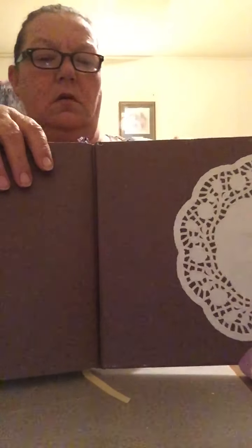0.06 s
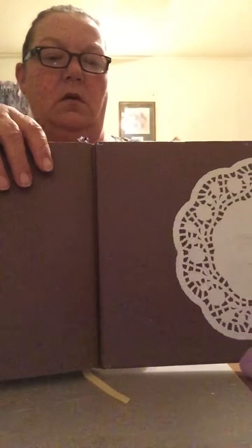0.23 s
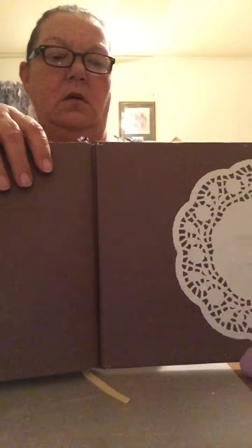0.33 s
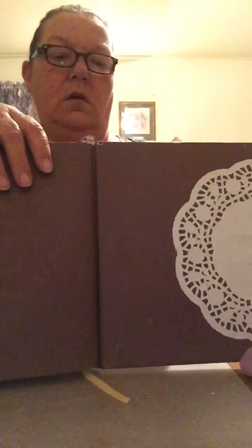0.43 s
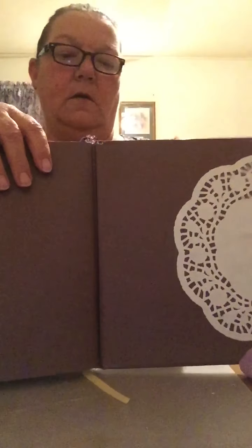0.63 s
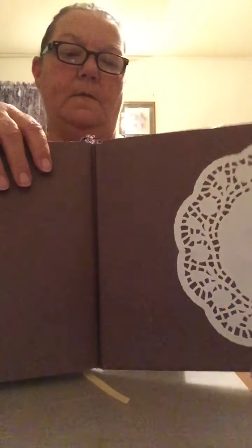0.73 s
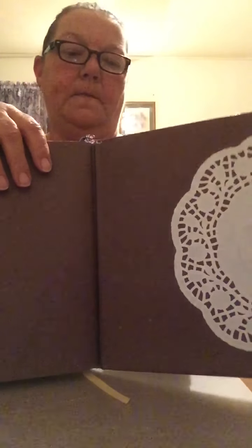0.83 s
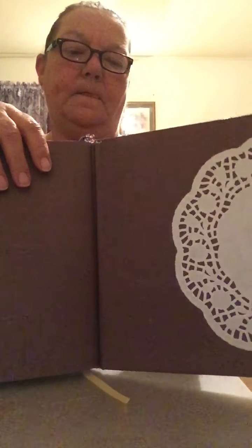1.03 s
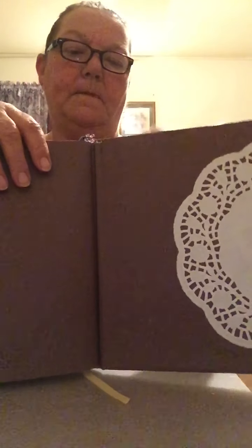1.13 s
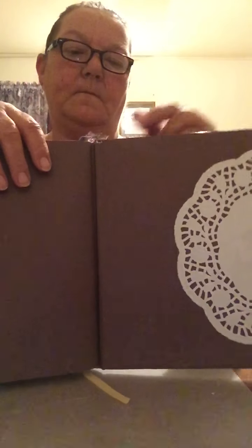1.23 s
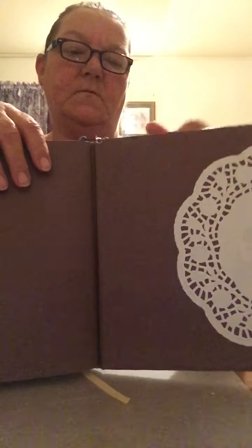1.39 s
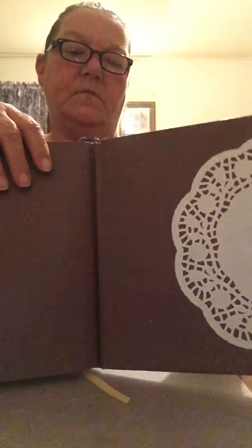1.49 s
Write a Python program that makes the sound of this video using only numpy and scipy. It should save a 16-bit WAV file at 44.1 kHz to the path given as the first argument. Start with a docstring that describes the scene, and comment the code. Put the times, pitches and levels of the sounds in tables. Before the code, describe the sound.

A cardboard book cover gives one hard snap as it is handled close to the microphone in a small room. Beads on its spine then tick and knock lightly, with soft card rustles and finger bumps over a low hum.

```python
"""Faint ticks and a brush of card come first, then one hard snap rings through a small room.
A cardboard book with beads on its spine is handled close by. The blow excites the cover's damped
modes; beads tick and knock, and fingers bump the boards. Friction makes card hiss and squeak as it
slides, and draws a soft groan from the swinging cover. A low hum runs underneath."""
import sys
import numpy as np
from scipy import signal
from scipy.fft import rfft, irfft, next_fast_len
from scipy.io import wavfile
from scipy.ndimage import map_coordinates

SR = 44100
rng = np.random.default_rng(int(sys.argv[2]) if len(sys.argv) > 2 else 0)


def pcm_store(signal):
    """Save signal as 16-bit PCM."""
    levels = np.round(np.clip(np.atleast_2d(signal), -1, 1) * 32767)
    wavfile.write(sys.argv[1], SR, levels.astype(np.int16).T)


N = 68355
T = np.arange(N) / SR

# modes of the cover under the snap: f/Hz, level/dB, t60/s
COVER_MODES = [(345, -17.5, 0.041), (637, -9.5, 0.02), (985, -1.5, 0.019), (1270, 2, 0.011),
               (1442, -17, 0.027), (2005, -9.5, 0.019), (2283, -8, 0.023), (2617, -3.5, 0.013),
               (3150, 4.5, 0.0089), (3894, -2.5, 0.0094), (4510, -17.5, 0.018), (5500, -13, 0.0077),
               (6220, -11, 0.0064), (8270, -22, 0.0055)]
# spectrum of the snap's crack: f/Hz, level/dB
CRACK_SPECTRUM = [(200, -28), (1000, 6.5), (4000, -5.5), (7000, -2), (11000, -16.5), (16000, -40)]
# echoes of the snap from near walls: delay/s, level/dB
WALL_ECHOES = [(.0098, -18.5), (.017, -21), (0.0237, -18)]
# modes of the boards and nearby things that ring on: f/Hz, level/dB, t60/s
SYMPATHETIC_MODES = [(335, -25.5, 0.22), (417.4, -29, 0.22), (576, -31.5, 0.081), (648.7, -33, 0.31),
                     (909, -28, 0.12), (966, -28, 0.14), (1094, -56, 1.6), (1245, -45, 0.98),
                     (1290, -31.5, .18), (1485, -32.5, 0.27), (1670, -51.5, 0.8), (2248, -38, 0.32),
                     (2333, -51.5, .6), (2652, -36.5, 0.27)]
# firm bead knocks: t/s, level/dB, most strongly excited f/Hz
BEAD_KNOCKS = [(.5035, -34, 2301), (.506, -30.5, 670), (.5402, -33, 670), (1.3558, -29.5, 1605),
               (1.4346, -22, 3320), (1.438, -23, 852), (1.482, -35, 4000)]
# modes of the board under a bead: f/Hz, level/dB, t60/s
KNOCK_MODES = [(699.4, -13, 0.085), (919, -4.5, 0.021), (1575, -3, 0.015), (3257, -2.5, 0.0096),
               (3460, -0.5, 0.015), (4110, -6, .014)]
# light bead ticks: t/s, level/dB, t60/s, tilt/(dB per octave)
BEAD_TICKS = [(.009, -44, 0.043, 2.5), (0.017, -48.5, 0.032, -2.5), (.1477, -53, 0.028, -1.5),
              (0.2717, -22.5, 0.0061, -2.5), (.4995, -38, 0.036, 0.5), (.5026, -38, 0.041, 9.5),
              (.5052, -35.5, 0.036, -4), (0.5189, -34.5, 0.038, -7.5), (0.526, -42.5, 0.033, 3),
              (.5398, -39.5, 0.052, 1), (0.5459, -43, 0.022, 0), (0.5875, -54.5, 0.12, -0.5),
              (.8745, -43, .005, 6.5), (0.9652, -44.5, 0.013, 14.5), (.905, -58.5, 0.02, 0),
              (1.002, -55, 0.016, 2.5), (1.1, -55, 0.022, -7), (1.206, -61, 0.018, 4),
              (1.3435, -48, 0.031, -7), (1.351, -47.5, 0.02, 3), (1.3555, -39, 0.0164, 3.5),
              (1.379, -53, 0.0063, 0), (1.405, -44, 0.013, 5.5), (1.421, -48, 0.14, -6),
              (1.4338, -31, .024, 1.5), (1.445, -45.5, 0.039, -1.5), (1.4543, -37, 0.01, 1),
              (1.465, -39, 0.031, -4.5), (1.4819, -36.5, 0.0077, 6.5), (1.49, -43, 0.01, 3)]
# spectrum of a bead on card: f/Hz, level/dB
TICK_SPECTRUM = [(100, -9), (540, -9.5), (670, 9.5), (780, -10), (910, 0), (1150, 0), (1600, 0.5),
                 (1950, -8.5), (2300, -2), (2750, -1.5), (3100, -7.5), (3500, -6.5), (4200, -6),
                 (4800, -10), (6200, -8), (7300, -12.5), (8200, -13), (10000, -17.5), (16000, -23)]
# soft finger bumps: t/s, level/dB, f/Hz, t60/s
FINGER_BUMPS = [(0.169, -29.5, 89.67, 0.054), (0.204, -49.5, 244, 0.12), (0.452, -25, 206, 0.012),
                (.652, -25.5, 375.4, 0.021), (1.3994, -28, 139.6, 0.092), (1.402, -24.5, 324.5, 0.036),
                (1.543, -45, 226.5, 0.053)]
# dull taps on the board: t/s, level/dB, f/Hz
FINGER_TAPS = [(0.6515, -31.5, 965), (1.3995, -34.5, 673)]
# modes of a tap: ratio to its f, level/dB, t60/s
TAP_PARTIALS = [(0.962, 0.5, 0.026), (0.688, -10, 0.031), (1.7, -23, 0.036), (3.23, -6.5, 0.0046)]
# card sliding on card: start/s, end/s, rise/s, sag/(dB per s), level/dB, tilt/(dB per octave)
SLIDE_STROKES = [(-.02, 0.057, 0.02, 233.5, -48.5, 15), (.338, 0.394, 0.014, 229, -55.5, 14),
                 (0.323, 0.56, 0.024, 72, -45, -2), (0.493, 0.575, 0.012, 72, -54.5, 5.5),
                 (0.887, 1.096, 0.0394, 3.5, -69, -7.5), (1.035, 1.12, 0.017, 87.5, -66, 9),
                 (1.336, 1.368, 0.017, 208, -46, 0), (1.399, 1.496, 0.035, 219, -52.5, 6.5)]
# spectrum of sliding card: f/Hz, level/dB
SLIDE_SPECTRUM = [(200, -14), (1000, -7.5), (2700, -5.5), (3350, 3), (3900, -0.5), (4450, -0.5),
                  (4950, -12.5), (5600, -4.5), (6400, -11), (10000, -20.5), (16000, -29)]
# stick-slip squeaks: peak t/s, width/s, level/dB, f/Hz
SQUEAK_EVENTS = [(0.148, 0.0061, -53, 2585), (0.389, .022, -47, 3450), (0.592, 0.0067, -53.5, 5150),
                 (1.066, 0.014, -57, 3550), (1.067, 0.017, -62, 5400), (1.101, 0.0056, -57, 3575),
                 (1.099, 0.0035, -61, 6950), (1.293, 0.0091, -52, 3837)]
# tones of a squeak: ratio to its f, level/dB
SQUEAK_PARTIALS = [(0.492, -7), (.84, -10), (0.997, 2.5), (1.56, -16)]
# rubs of the swinging cover: start/s, end/s, level/dB, resonance f/Hz
COVER_RUBS = [(0.193, 0.308, -46.5, 169), (0.397, 0.495, -50.5, 139.7), (0.85, 1.197, -61, 321.5),
              (1.189, 1.38, -68.5, 315), (1.112, 1.367, -67, 137), (1.42, 1.49, -51, 148.5)]
# spectrum of the scrape in a rub: f/Hz, level/dB
SCRAPE_SPECTRUM = [(150, -3), (400, -3), (780, -7), (1150, 6), (1600, -5), (2250, -1.5), (5000, -17),
                   (16000, -28)]
# reverberation time of the room: f/Hz, t60/s
REVERB_TIMES = [(150, 0.83), (400, 0.17), (1200, 0.4), (3500, 0.41), (8000, 0.51), (16000, 0.36)]
# colour of the reflections: f/Hz, level/dB
WALL_RESPONSE = [(100, -2), (350, 5), (700, 2), (1000, -3.5), (2000, 1.5), (3100, -10), (4200, -2.5),
                 (5200, -9.5), (16000, -4)]
# harmonics of the hum: f/Hz, level/dB
HUM_PARTIALS = [(46.5, -17.5), (93.3, 2.5), (140, -15)]
# wavering envelope of the hum: t/s, relative level/dB
HUM_ENVELOPE = [(0.0, -48), (0.128, -60.5), (0.18, -43), (0.21, -55), (0.34, -55), (0.448, -49),
                (1.32, -53.5), (1.346, -64), (1.394, -54.5), (1.55, -72)]
# spectrum of the low rumble: f/Hz, level/dB
RUMBLE_SPECTRUM = [(20, -57.5), (32, -37), (42, -1.5), (75, -4.5), (120, -8), (200, -32), (500, -61)]
# envelope of the rumble: t/s, relative level/dB
RUMBLE_ENVELOPE = [(0.0, -56.5), (0.15, -53), (0.164, -50), (1.07, -61), (1.436, -60.5), (1.48, -47.5),
                   (1.55, -70)]
# spectrum of the room hiss: f/Hz, level/dB
HISS_SPECTRUM = [(25, -42.5), (60, -8.5), (130, 0.5), (200, 0), (400, -9.5), (700, -10.5), (2000, -12),
                 (4000, -15.5), (8000, -20), (16000, -23.5)]

SNAP_S, SNAP_RISE_S = 0.2473, 0.001
BEND_DELAY_S = 0.0005  # travel time of a 1 kHz bending wave
CRACK_DB, CRACK_T60 = -18.5, 0.012
KNOCK_FALL_DB = 9  # per octave away from the most strongly excited frequency
SLIDE_RELEASE_S, SQUEAK_JITTER_RAD = 0.033, 1.2
RIPPLE_DB, RIPPLE_SPACING_HZ = 4, 104.2
RUB_Q, RUB_SCRAPE_DB, RUB_EDGE_S = 4.2, -14, 0.1
TAIL_DB, EARLY_DB, EARLY_T60 = -19.5, -5.5, 0.2
SMALL_WET_DB, FINGER_WET_DB = -1.5, -8  # small, close sounds are drier; fingers are the driest
HUM_DB, RUMBLE_DB, HISS_DB = -0.5, 1, -68
LOW_HZ, TOP_HZ = 37, 16200


def snap():
    """Impact excitation: a crack and the cover's modes, echoed by walls. Dispersion puts treble first."""
    board = sum(amp(db) * ring(SNAP_S + BEND_DELAY_S * np.sqrt(1000 / hz), hz, t60, SNAP_RISE_S)
                for hz, db, t60 in COVER_MODES)
    crack = amp(CRACK_DB) * noise(CRACK_SPECTRUM) * decay(SNAP_S, CRACK_T60, rise=0.00016)
    direct = board + crack
    echoes = sum(amp(db) * np.interp(T - delay, T, direct) for delay, db in WALL_ECHOES)
    return direct + echoes


def sympathetic_ringing():
    """Sympathetic vibration: lightly damped modes ring on faintly after the snap."""
    return sum(amp(db) * ring(SNAP_S, hz, t60, rise=0.004) for hz, db, t60 in SYMPATHETIC_MODES)


def bead_knocks():
    """Modal excitation: the point of contact weights the modes of a short, hollow ring."""
    out = np.zeros(N)
    for s, db, centre in BEAD_KNOCKS:
        for hz, level, t60 in KNOCK_MODES:
            octaves = abs(np.log2(hz / centre))
            out += amp(db + level - KNOCK_FALL_DB * octaves) * ring(s, hz, t60, rise=0.0011)
    return out


def bead_ticks():
    """Brief contact has a broad spectrum: each bead on card gives a crackling burst of noise."""
    out = np.zeros(N)
    for s, db, t60, tilt in BEAD_TICKS:
        crackle = unit(noise(TICK_SPECTRUM, tilt) * amp(2.8 * wobble(1100)))
        out += amp(db) * decay(s, t60, rise=0.0001) * crackle
    return out


def fingers():
    """Contact time limits bandwidth: soft bumps move the whole board, quicker taps ring higher modes."""
    bumps = sum(amp(db) * ring(s, hz, t60, rise=0.0022) for s, db, hz, t60 in FINGER_BUMPS)
    taps = sum(amp(db + level) * ring(s, hz * ratio, t60, rise=0.00022)
               for s, db, hz in FINGER_TAPS for ratio, level, t60 in TAP_PARTIALS)
    return bumps + taps


def card_slides():
    """Sliding friction: grainy noise swells, sags as the stroke slows, and stops."""
    out = np.zeros(N)
    for start, end, rise, sag, db, tilt in SLIDE_STROKES:
        gate = np.clip(np.minimum((T - start) / rise, (end - T) / SLIDE_RELEASE_S + 0.5), 0, 1)
        friction = noise(SLIDE_SPECTRUM, tilt) * amp(3.9 * wobble(600) + 1.05 * wobble(50))
        level = db - sag * np.maximum(T - start - rise, 0)
        out += amp(level) * gate * unit(board_ripple(friction))
    return out


def board_ripple(x):
    """Modal overlap: many fine resonances give random peaks and dips, new for each point of contact."""
    ripple_db = RIPPLE_DB * rng.standard_normal(SR)
    return filtered(x, lambda hz: amp(np.interp(hz / RIPPLE_SPACING_HZ, np.arange(SR), ripple_db)))


def squeaks():
    """Stick-slip oscillation: surfaces catch and release, sounding a few unsteady tones."""
    out = np.zeros(N)
    for s, width, db, hz in SQUEAK_EVENTS:
        tones = sum(amp(level) * np.sin(2 * np.pi * hz * ratio * T + SQUEAK_JITTER_RAD * wobble(500))
                    for ratio, level in SQUEAK_PARTIALS)
        out += amp(db) * unit(tones) * np.exp(-2 * np.abs(T - s) / width)
    return out


def cover_rubs():
    """Forced vibration: friction drives one low resonance of the board, with a faint scrape above."""
    out = np.zeros(N)
    for start, end, db, centre in COVER_RUBS:
        def resonance(hz):
            damping = 1j * hz * centre / RUB_Q
            return (damping / (centre ** 2 - hz ** 2 + damping)) ** 2
        groan = unit(filtered(rng.standard_normal(N), resonance))
        scrape = unit(noise(SCRAPE_SPECTRUM) * amp(3 * wobble(250) + 2 * wobble(31)))
        pressure = np.clip(np.minimum(T - start, end - T) / RUB_EDGE_S + 0.5, 0, 1)
        out += amp(db) * pressure * (groan + amp(RUB_SCRAPE_DB) * scrape)
    return out


def room(x):
    """Reverberation: dense early reflections from table and walls, then a softer tail."""
    hz, t, spectra = signal.stft(rng.standard_normal(N), SR, nperseg=256)
    absorption = amp(-60 * t / along(REVERB_TIMES, hz)[:, None])
    build_up = np.clip(T / 0.0099, 0, 1)
    tail = signal.istft(spectra * absorption, SR, nperseg=256)[1][:N] * build_up
    early = rng.standard_normal(N) * decay(0.0023, EARLY_T60, rise=0.00029)
    response = amp(TAIL_DB) * tail / np.linalg.norm(tail) + amp(EARLY_DB) * early / np.linalg.norm(early)
    return filtered(signal.fftconvolve(x, response)[:N], lambda hz: amp(along(WALL_RESPONSE, hz)))


def background():
    """Ambient noise and handling: a hum modulated in level and phase and a room hiss, with a low rumble from
    the board being moved."""
    hum = sum(amp(db) * np.sin(2 * np.pi * hz * T + 0.12 * wobble(19)) for hz, db in HUM_PARTIALS)
    hum_gain = amp(HUM_DB + np.interp(T, *np.transpose(HUM_ENVELOPE)))
    rumble_gain = amp(RUMBLE_DB + np.interp(T, *np.transpose(RUMBLE_ENVELOPE)))
    return hum_gain * unit(hum) + rumble_gain * noise(RUMBLE_SPECTRUM) + amp(HISS_DB) * noise(HISS_SPECTRUM)


def ring(s, hz, t60, rise):
    """Free vibration of one damped mode struck at time s."""
    return decay(s, t60, rise) * np.sin(2 * np.pi * hz * (T - s))


def decay(s, t60, rise):
    """Exponential damping: a quick rise at time s, then a fall of 60 dB every t60."""
    t = np.maximum(T - s, 0)
    return (1 - np.exp(-t / rise)) * amp(-60 * t / t60)


def noise(spectrum, tilt_db=0, pivot_hz=3000):
    """Spectral shaping: coloured noise of rms 1, tilted by tilt_db per octave."""
    colour = lambda hz: amp(along(spectrum, hz) + tilt_db * np.log2(0.1 + hz / pivot_hz))
    return unit(filtered(rng.standard_normal(N), colour))


def wobble(rate):
    """Random modulation: a smooth curve with rate knots a second."""
    return map_coordinates(rng.standard_normal(N), [T * rate + 2], mode="wrap")


def filtered(x, response):
    """Linear filtering: the spectrum of x times a function of frequency."""
    size = next_fast_len(N + SR // 2)
    return irfft(rfft(x, size) * response(np.fft.rfftfreq(size, 1 / SR)), size)[:N]


def along(points, hz):
    """Interpolation of (f/Hz, value) points on a logarithmic frequency axis."""
    f, values = np.transpose(points)
    return np.interp(np.log(hz + 1), np.log(f + 1), values)


def amp(db):
    """Amplitude ratio of a level in decibels."""
    return 10 ** (np.asarray(db) / 20)


def unit(x):
    """Normalisation to rms 1."""
    return x / np.sqrt(np.mean(x ** 2) + 1e-20)


def scene():
    """Superposition: direct handling sounds, their reverberation and the background add."""
    blow = snap()
    small = bead_ticks() + bead_knocks() + card_slides() + squeaks() + cover_rubs()
    bumps = fingers()
    reverb = room(blow + amp(SMALL_WET_DB) * small + amp(FINGER_WET_DB) * bumps)
    return (blow + small + bumps + reverb + sympathetic_ringing() + background())[None]


def record(dry):
    """Band limiting: the lowest bass is cut and nothing passes above TOP_HZ."""
    passband = lambda hz: (hz < TOP_HZ) * (1 - np.exp(-(hz / LOW_HZ) ** 8))
    return filtered(dry[0], passband)[None]


dry = scene()
out = record(dry)
pcm_store(out)
```